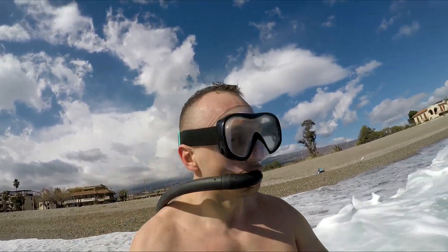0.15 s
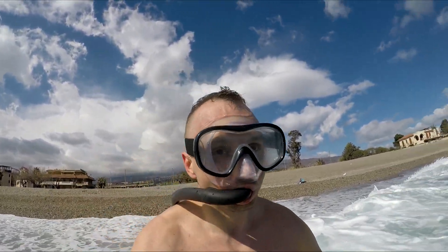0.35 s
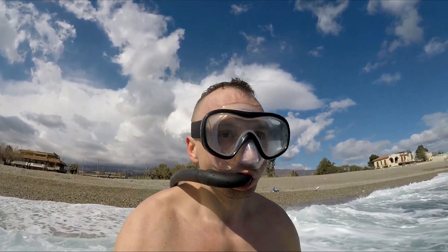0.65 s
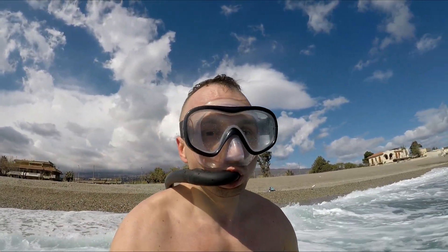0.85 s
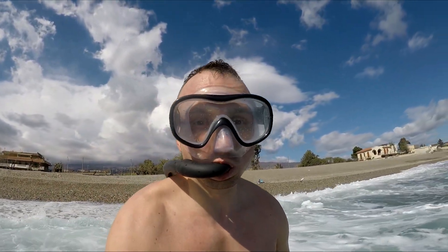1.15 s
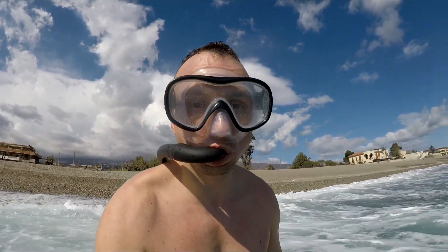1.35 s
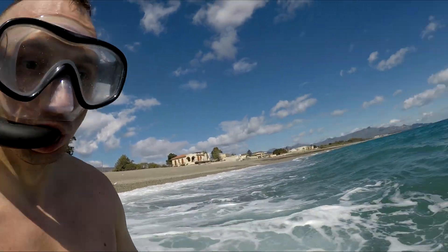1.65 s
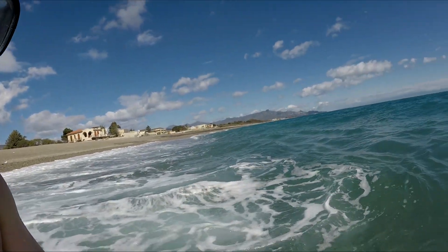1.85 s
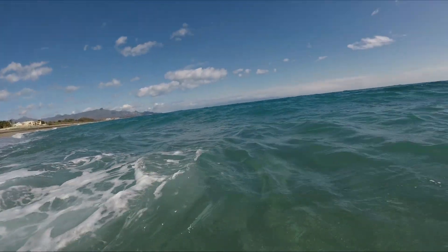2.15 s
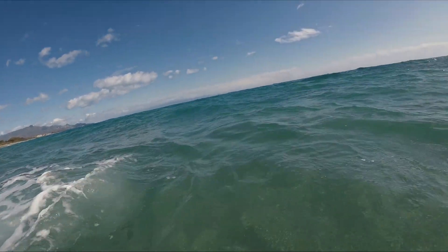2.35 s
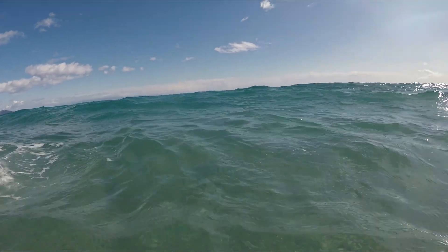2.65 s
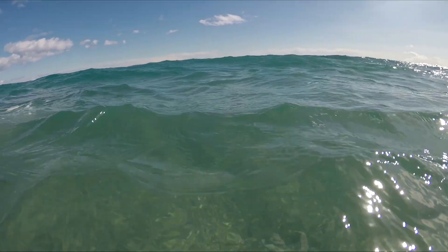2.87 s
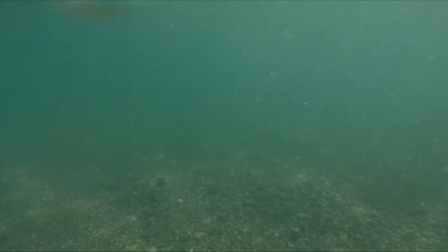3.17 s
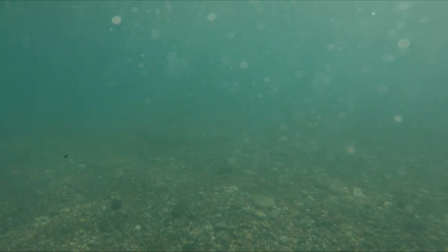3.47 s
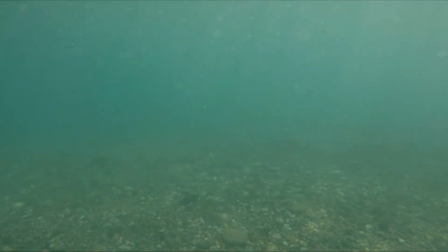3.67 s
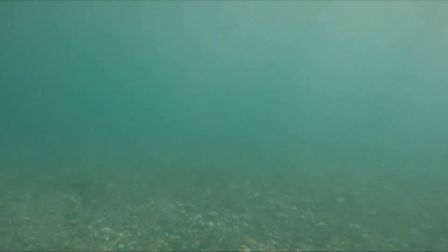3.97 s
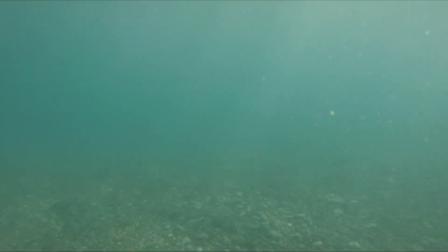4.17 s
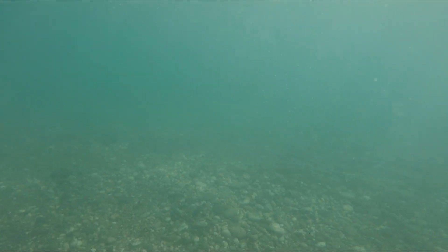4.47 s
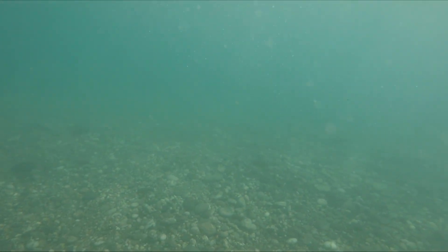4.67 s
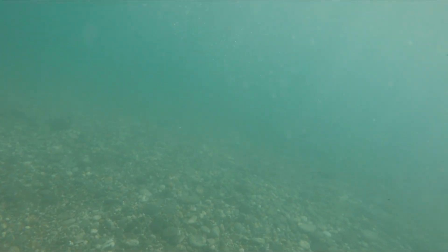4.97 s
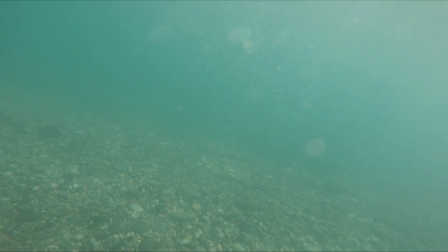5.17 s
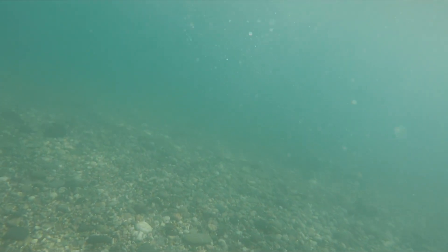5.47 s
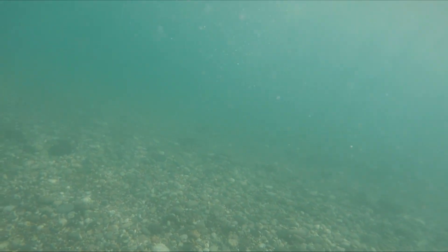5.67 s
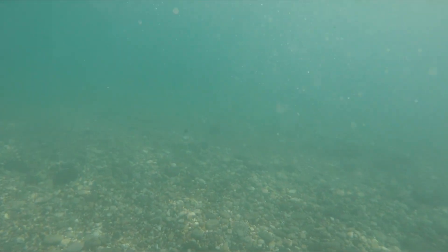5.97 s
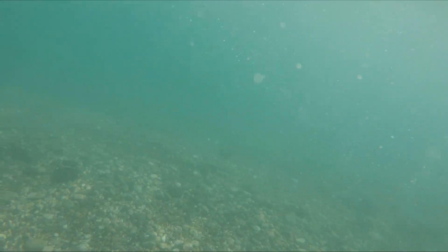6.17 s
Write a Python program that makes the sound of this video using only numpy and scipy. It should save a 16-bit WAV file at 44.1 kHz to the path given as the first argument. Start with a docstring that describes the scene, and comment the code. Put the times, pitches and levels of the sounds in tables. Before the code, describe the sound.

At a beach, close on a handheld camera in a case, wind buffets over broad surf wash and thin foam hiss. Low slaps and hollow plops knock the case with small splashes and droplet ticks, growing denser. A hard plunge abruptly shuts off the treble; muffled gulps, rumble and swarms of bubbles follow, then quick evenly spaced bubble blips and a faint growing fizz.

```python
"""Camera pushed under at a beach

Wind lumps, surf wash and foam hiss are shaped noise; slaps, plops and drops on the case are damped tones.
At about 3.3 s the case goes under: the treble shuts off and swarms of random bubble pings gurgle.
A chain of evenly spaced two-tone bubbles leaves one air pocket; gliding tones ring in others.
Gain control ducks after loud blows."""
import sys
import numpy as np
from scipy import signal
from scipy.fft import rfft, irfft
from scipy.io import wavfile
from scipy.ndimage import uniform_filter1d

SR = 44100
rng = np.random.default_rng(int(sys.argv[2]) if len(sys.argv) > 2 else 0)


def master_out(mix):
    """Clip the mix to full scale and print it as 16-bit PCM to the path in sys.argv[1]."""
    frames = np.transpose(np.atleast_2d(mix))
    ceiling = np.clip(frames, -1, 1)
    pcm = np.round(ceiling * 32767).astype(np.int16)
    wavfile.write(sys.argv[1], SR, pcm)


N = 278712
T_S = np.arange(N) / SR

# slow levels above the surface, before gusts and surges: t/s, wind/dB, wash/dB, foam/dB
AIR_LEVELS = [(0, -22.5, -30, -38), (0.7, -28, -28.5, -39), (1.2, -41.5, -25.5, -39.5),
              (1.5, -22.5, -27.5, -41.5), (2.1, -31, -25, -37), (2.42, -30, -33, -43.5),
              (2.8, -20, -29.5, -46.5), (3.05, -34, -31, -44), (3.285, -14, -16, -39.5)]
# slow levels below: t/s, rumble/dB, large bubbles/dB, their pitch f/Hz, middle/dB, small/dB (before bursts)
WATER_LEVELS = [(3.291, -45.5, -43, 184, -32.5, -43), (3.409, -40.5, -35, 172.5, -34.5, -54),
                (3.501, -31, -31.5, 140, -34, -41.5), (3.8, -33.5, -28, 262, -35.5, -42),
                (3.95, -29.5, -23.5, 180, -34.5, -49), (4.299, -37, -21.5, 249, -27, -44.5),
                (4.499, -29, -21, 185, -28, -48), (4.699, -34.5, -30, 128.8, -30.5, -55),
                (5.109, -31, -41, 146, -29, -45.5), (5.201, -31.5, -22, 199, -29, -46),
                (5.45, -23.5, -22.5, 237, -25.5, -44), (5.802, -25.5, -33, 233, -24.5, -43),
                (6.06, -32.5, -46.5, 136, -23, -37), (6.28, -24, -23.5, 192, -17, -33)]
# single bubbles closing near the ports: t/s, peak level/dB, f/Hz
PLOP_EVENTS = [(1.799, -9, 532), (1.89, -11, 560), (1.923, -16.5, 1140), (2.158, -16.5, 500),
               (2.203, -17, 596), (2.469, -7.5, 650), (2.509, -6.5, 590), (2.533, -20, 700),
               (2.56, -12, 630), (2.574, -6.5, 560), (2.696, -9, 940), (3.163, -7.5, 1780),
               (3.188, -9, 774), (3.204, 1, 690), (3.268, -6, 504), (4.072, -17, 560), (4.135, -16.5, 706),
               (4.17, -18.5, 643), (4.197, -23.5, 995), (4.293, -11, 439), (4.486, -27, 1360),
               (5.476, -11, 475), (5.495, -8.5, 460), (5.731, -13, 897), (5.841, -10.5, 529)]
AIR_END_S, WATER_START_S = AIR_LEVELS[-1][0], WATER_LEVELS[0][0]


def amp(db):
    """Amplitude factor of a level in dB."""
    return 10 ** (np.asarray(db) / 20)


def evened(x):
    """Scale to an RMS of 1."""
    return x / np.sqrt(np.mean(x ** 2) + 1e-20)


def read(points, hz):
    """Interpolate a frequency table on a log axis."""
    f, value = np.transpose(points)
    return np.interp(np.log(hz + 1), np.log(f + 1), value)


def at(points, s=T_S):
    """Interpolate a time table, end values held."""
    return np.interp(s, *np.transpose(points))


def levels(rows):
    """One gain curve per dB column: silent before the table, last row held."""
    s, *columns = np.transpose(rows)
    return [amp(np.interp(T_S, s, column, -200)) for column in columns]


def bumps(rows, half_s):
    """Sum of bell-shaped lifts in dB, one for each row."""
    return sum(db * np.exp(-((T_S - s) / half_s) ** 2) for s, db in rows)


def add(mix, s, sound):
    """Add a two-channel sound at s, cut at the end of the mix."""
    part = mix[:, round(s * SR):][:, :sound.shape[1]]
    part += sound[:, :part.shape[1]]


def lowpass(x, order, hz):
    """Butterworth lowpass."""
    return signal.sosfilt(signal.butter(order, hz, fs=SR, output="sos"), x)


def noise(colour, size, patchy_db, flicker_db):
    """Two channels of random short-time spectra, with patches and a flicker shared by all bins."""
    # left-right coherence: f/Hz, coherence/1
    same = [(60, 0.97), (170, 0.55), (470, 0.76), (1300, 0.65), (10000, 0.39)]
    # phase by which the left port leads: f/Hz, lead/rad
    lead = [(550, 0.92), (1030, 2.3), (2300, 1.82), (3600, 0.3), (7200, -2)]
    # right port over left: f/Hz, level/dB
    right_over_left = [(600, 0), (6000, 3)]
    hop, hz = size // 4, np.fft.rfftfreq(size, 1 / SR)
    a, b, c, d, patches = rng.standard_normal((N // hop + 5, len(hz), 5)).T
    flicker = evened(uniform_filter1d(patches[0], size=4))
    patches = uniform_filter1d(patches, size=8, axis=0)
    patches = evened(uniform_filter1d(patches, size=10, axis=1))

    like = np.clip(read(same, hz), -1, 1)[:, None]
    lag = np.exp(-1j * read(lead, hz))[:, None]
    left = a + 1j * b
    right = like * lag * left + np.sqrt(1 - like ** 2) * (c + 1j * d)
    z = np.array([left, right])
    z *= amp(np.outer([-.5, .5], read(right_over_left, hz)))[:, :, None]
    z *= amp(read(colour, hz)[:, None] + patchy_db * patches + flicker_db * flicker)
    return evened(signal.istft(z, nperseg=size, noverlap=size - hop)[1][:, :N])


def ping(hz, t60, rise_s, glide):
    """Damped tone, envelope peak 1; its frequency climbs by the share 2 * glide over t60 seconds."""
    t = np.arange(round(t60 * SR) + 20) / SR
    shape = (1 - np.exp(-t / rise_s)) * amp(-60 * t / t60)
    return shape / shape.max() * np.sin(2 * np.pi * hz * t * (1 + glide * t / t60))


def struck(rows, rise_cycles, glide, late_ms, lag_ms):
    """Damped tones shortly after contact; the right port lags until water bridges the ports."""
    out = np.zeros((2, N))
    for s, db, hz, t60 in rows:
        tone = amp(db) * ping(hz, t60, rise_cycles / hz, glide)
        right_lag_ms = lag_ms * np.interp(s, [3.1, 3.3], [1, 0])
        add(out, s + late_ms / 1000, tone * [[1], [0]])
        add(out, s + (late_ms + right_lag_ms) / 1000, tone * [[0], [1]])
    return out


def slaps():
    """The case rings low under each slap; gulps below swell softly and stop short; plops ring higher."""
    # water slapping the case, large gulps below: t/s, peak level/dB, f/Hz
    slap_events = [(1.439, -16, 142), (1.506, -13, 78.5), (1.662, -3, 127), (1.773, 1.5, 140),
                   (2.024, -6, 87.4), (2.156, -2, 127), (2.205, -6, 157), (2.253, -8.5, 134),
                   (2.335, -3, 278), (2.459, -11.5, 128), (2.696, -3.5, 141.4), (3.126, -0.5, 177),
                   (3.179, -1, 60.6), (3.277, 5.5, 275), (3.612, -6.5, 176), (3.686, -3.5, 192),
                   (3.74, -8.5, 322), (3.765, -8, 272), (3.789, -21, 270), (3.806, -20, 330),
                   (3.832, -16, 250), (4.344, -9, 172), (5.16, -11, 103)]
    # a hard slap is smothered by water; softer ones ring longer
    t60_cycles_at_0db, cycles_per_db = 6.7, 0.58
    plops = [(s, db, hz, 24 / hz) for s, db, hz in PLOP_EVENTS]
    knocks = [(s, db, hz, (t60_cycles_at_0db - cycles_per_db * db) / hz)
              for s, db, hz in slap_events if s < WATER_START_S]
    gulps = [(s, db, hz, 3.7 / hz) for s, db, hz in slap_events if s > WATER_START_S]
    out = struck(knocks, 0.033, 0.19, late_ms=4.2, lag_ms=0.98)
    out += struck(plops, 0.16, 0.029, late_ms=1.4, lag_ms=0.77)
    out += struck(gulps, 0.69, 0.068, late_ms=6.0, lag_ms=0)
    return lowpass(out, 2, 1800)


def swarm(centre_hz, usual_hz, octaves, per_s, cycles, murmur, clump_db):
    """Bubbles of one size class pop in clumps around a centre pitch, a few loud; far ones blur to a murmur."""
    pops = amp(4.9 * np.minimum(rng.exponential(1, N), 4)) * (rng.random(N) < per_s / SR)
    kind, out = rng.integers(0, 14, N), np.zeros(N)
    clumps = uniform_filter1d(rng.standard_normal(N), size=1100)
    clumps = evened(uniform_filter1d(clumps, size=700))
    # 4.5 to 5.5 s: murmur grows sixfold; clumping vanishes at 5 s, then returns inverted
    calm = np.clip(T_S - 4.5, 0, 1)
    far = (1 + 5.0 * calm) * murmur * np.sqrt(per_s / 3000) * rng.standard_normal(N)
    drive = (pops + far) * amp(clump_db * (0.5 - 1.0 * calm) * clumps)
    for k, hz in enumerate(usual_hz * np.geomspace(.5, 2, num=14)):
        share = .12 + np.exp(-.5 * (np.log2(hz / centre_hz) / octaves) ** 2)
        bubble = ping(hz, 3.5 * cycles / hz, 0.5 / hz, glide=0.07)
        out += signal.oaconvolve(drive * share * (kind == k), bubble)[:N]
    return out / np.sqrt(uniform_filter1d(out ** 2, size=7000) + 1e-12)  # level evened over 0.16 s


def chain():
    """Bubbles pinch off the pocket one after another, each with its tone and a higher one."""
    # runs of evenly spaced bubbles: first t/s, last t/s, gap/s
    runs = [(3.502, 3.61, .0195), (4.733, 4.81, .022), (4.838, 4.92, .026), (4.944, 5.08, .031),
            (5.125, 5.2, .023), (5.2225, 5.44, .0231), (5.457, 5.58, .028), (5.65, 5.9, .0275),
            (5.939, 6.05, .0265), (6.124, 6.31, .0255)]
    # lower tone before scatter: t/s, peak level/dB
    loudness = [(4.75, -23), (4.95, -16), (5.06, -27), (5.2, -20.5), (5.33, -14.5), (5.41, -19.5),
                (5.6, -25.5), (6.2, -18)]
    # lower tone: t/s, f/Hz
    low_pitch = [(3.6, 503), (4.75, 800), (5.0, 794), (5.35, 852), (5.85, 850), (5.98, 946), (6.3, 930)]
    # higher tone: t/s, f/Hz
    high_pitch = [(5.22, 1210), (5.5, 1503), (5.7, 1360)]
    # higher tone relative to the lower: t/s, level/dB
    high_level = [(5.0, -19), (5.35, -9)]
    jitter_s, scatter_db = 0.0008, 1.8
    out = np.zeros((2, N))  # rows: lower, higher tones
    for first, last, gap in runs:
        for s, (low, high, late, loud) in zip(np.arange(first, last, gap), rng.standard_normal((20, 4))):
            gain = amp(at(loudness, s) + scatter_db * loud)
            start = s + jitter_s * (1 + 3 * (s > runs[-3][0])) * late  # the last runs stumble
            low_hz = at(low_pitch, s) * (1 + 0.033 * low)
            high_hz = at(high_pitch, s) * (1 + 0.051 * high)
            add(out, start, gain * ping(low_hz, 0.027, 0.0015, 0.068) * [[1], [0]])
            add(out, start, gain * ping(high_hz, 0.024, .0025, 0.0096) * [[0], [1]])
    return out[0] + amp(at(high_level)) * out[1]


def water():
    """Rumble, swarms, chain and fizz; the ports differ until their trapped air is gone, then hear alike."""
    # large, middle, small: usual f/Hz, spread/octaves, rate/(1/s), ring/cycles (t60 is 3.5 times this),
    # murmur share/1, clumping/dB (at most half acts)
    size_classes = [(169.4, 0.73, 150, 8.8, 1, 4.5), (512.5, 0.59, 400, 9.6, 0.2, 1),
                    (1412, 0.62, 600, 10, 0.11, 2)]
    # pitch around which the small bubbles pop: t/s, f/Hz
    small_pitch = [(3.501, 966), (5.297, 1380)]
    # bursts of small bubbles over their slow level: peak t/s, lift/dB
    bursts = [(3.44, 9.5), (3.97, 6), (4.13, 7), (4.24, 3), (4.35, 9.5), (4.505, 9.5)]
    # fizz colour: f/Hz, relative level/dB per Hz
    fizz_colour = [(1940, -40), (3000, -7), (7300, -7), (8990, 0), (10500, -6), (13600, -30), (22000, -120)]
    # fizz: t/s, level/dB
    fizz_swell = [(4.7, -83.5), (5.2, -68.5), (6.1, -58), (6.3, -54.5)]
    # side over mid, before settling: f/Hz, level/dB
    wide = [(60, -9.5), (330, 13.5), (1820, 23.5)]
    # gain on the side part: t/s, level/dB
    settling = [(3.799, -20.5), (4.352, -28.5), (4.8, -79)]
    rumble_colour = [(20, 17.5), (45, 7.5), (80, 20.5), (130, -54.5)]  # f/Hz, relative level/dB per Hz

    rows = np.array(WATER_LEVELS)
    rumble, *gains = levels(rows[:, [0, 1, 2, 4, 5]])
    gains[2] = gains[2] * amp(bumps(bursts, half_s=0.04))
    centres_hz = [at(rows[:, [0, 3]]), size_classes[1][0], at(small_pitch)]
    mid = chain()
    for gain, hz, row in zip(gains, centres_hz, size_classes):
        mid += gain * swarm(hz, *row)
    mid = lowpass(mid, 4, 2400)  # flooded ports dull the bubbles
    mid += rumble * noise(rumble_colour, size=2048, patchy_db=6.0, flicker_db=-4.0)[0]
    mid += levels(fizz_swell)[0] * noise(fizz_colour, size=512, patchy_db=.5, flicker_db=.5)[0]

    # other bubbles at each port: the mix from 0.16 s ahead, opposite in the two channels
    other = np.roll(mid, -7000) * (mid != 0)
    side = irfft(rfft(other) * amp(read(wide, np.fft.rfftfreq(N, 1 / SR))), N)
    side *= amp(at(settling))
    return np.array([mid + side, mid - side])


def plunge():
    """A swarm churned up as the case breaks the surface, a little later at the right port."""
    # churned bubbles: t/s, level/dB
    churn_level = [(2.9, -30), (2.97, -25), (3.08, -22.5), (3.15, -33.5), (3.23, -26), (3.28, -35),
                   (3.34, -200)]
    churn = levels(churn_level)[0] * swarm(650, 650, 0.28, 355, 36.0, 0.3, 11)
    return np.array([churn, np.roll(churn, 30)])


def pockets():
    """Air pockets kept ringing by the churn: narrow gliding tones, wavering like a blown bottle."""
    # ringing pockets: start t/s, end t/s, level/dB before the waver, first f/Hz, last f/Hz
    pocket_events = [(2.023, 2.088, -16.5, 98, 158), (2.9, 3.123, -17.5, 116.5, 124.7),
                     (2.93, 2.986, -31.5, 777, 697), (2.995, 3.073, -24.5, 564, 512),
                     (2.995, 3.066, -24, 806, 750), (3.075, 3.143, -29.5, 1038, 1080),
                     (3.205, 3.241, -20.5, 907, 1070), (3.21, 3.267, -19.5, 741, 777),
                     (3.895, 3.947, -18, 226, 193), (3.97, 4.059, -20, 180.4, 206.6),
                     (6.03, 6.309, -23, 850, 935), (5.885, 5.974, -20.5, 494, 476),
                     (5.94, 6.098, -23, 132, 129), (5.975, 6.149, -19, 493.6, 531.5),
                     (6.12, 6.296, -15, 155.8, 152.4), (6.195, 6.293, -16, 336, 349)]
    q, edge_share = 5.0, 0.4  # pitch over bandwidth; share of the length spent fading in and out
    out = np.zeros((2, N))
    for start, end, db, first_hz, last_hz in pocket_events:
        count = round((end - start) * SR)
        turn = np.exp(2j * np.pi * np.cumsum(np.linspace(first_hz, last_hz, num=count)) / SR)
        r = np.exp(-np.pi * first_hz / q / SR)
        a, b = rng.standard_normal((2, 14000))
        waver = signal.lfilter([1], [1, -r], a + 1j * b)
        waver = signal.lfilter([1], [1, -r], waver)
        waver = 0.75 + waver[-count:] / np.sqrt(np.mean(abs(waver) ** 2))
        quarter = 1j ** (start < AIR_END_S)  # in air the right port lags a quarter cycle
        tone = (turn * waver * [[1], [1 / quarter]]).real
        add(out, start, amp(db) * signal.windows.tukey(count, edge_share) * tone)
    return out


def splashes():
    """Each plop above the surface throws a ragged noise splash that dies away."""
    # splash colour: f/Hz, relative level/dB per Hz
    splash_colour = [(150, -10.5), (500, -0.5), (1200, 1.5), (2300, -15.5), (4000, -47.5)]
    below_plop_db, t60_s = -12, 0.12
    level = np.zeros(N)
    for s, db, _ in PLOP_EVENTS:
        level += (T_S > s) * amp(db + below_plop_db - 60 * abs(T_S - s) / t60_s)
    level = (T_S < AIR_END_S) * uniform_filter1d(level, size=120)
    return level * noise(splash_colour, size=256, patchy_db=4.0, flicker_db=3.5)


def drops():
    """Drops on the ports: a short ping louder on the right, a wide tick, a burst of spray at the pitch."""
    # drops and spray: t/s, ping peak level/dB, f/Hz
    drop_events = [(0.472, -25, 2070), (0.716, -25.5, 1870), (1.989, -25.5, 2160), (2.1613, -21, 3080),
                   (2.2776, -24, 3940), (2.321, -22, 2020), (2.5652, -23, 2080), (2.652, -18, 1990),
                   (2.7764, -29.5, 2820), (2.814, -25, 1430), (2.9128, -24.5, 7050), (2.984, -17.5, 6070),
                   (3.0308, -23.5, 3460), (3.076, -21.5, 7400), (3.0883, -11, 2990), (3.11, -14.5, 2040),
                   (3.13, -4, 5900), (3.175, -14, 1610), (3.187, -24.5, 6500), (3.2192, -13, 2640),
                   (3.244, -18, 4060), (3.2758, -16, 2260), (3.325, -24.5, 990), (3.3565, -24, 1080),
                   (3.393, -24, 920), (3.4376, -37, 1500), (3.5314, -33.5, 1660), (3.713, -37, 2500),
                   (3.8241, -37, 2060), (4.24, -45, 2660), (4.357, -46.5, 2600)]
    out, n = np.zeros((2, N)), np.arange(1200)
    for s, db, hz in drop_events:
        wet = s > WATER_START_S  # below: weaker tick, slower ping
        tick, spray = rng.standard_normal((2, 2, 1200))
        tick_db = db + 1.5 + 5 * np.log2(hz / 5000) - 32 * wet - 0.21 * n
        add(out, s, amp(tick_db) * tick)
        add(out, s, amp(db) * ping(hz, 0.0079 + 14 / hz, 0.0001 + 0.00097 * wet, 0.059) * [[.6], [1]])
        resonance = ping(0.99 * hz, 3 / hz, .0001, 0)[None]
        spray = evened(signal.oaconvolve(spray, resonance, axes=1)[:, :1200])
        add(out, s, amp(db - 5.0 - 0.044 * n) * spray)
    return lowpass(out, 6, 9000)


def air():
    """Wind lumps, the broad wash of the surf and the hiss of its foam, until the ports go under."""
    # wind colour: f/Hz, relative level/dB per Hz
    wind_colour = [(12, -16.5), (20, -5.5), (242, -20.5), (390, -33), (660, -120)]
    # wash colour: f/Hz, relative level/dB per Hz
    wash_colour = [(88, 0), (489, -9), (1000, -15), (1880, -17.5), (2600, -26.5), (3380, -37.5),
                   (5720, -120)]
    # foam colour: f/Hz, relative level/dB per Hz
    foam_colour = [(1350, 2), (2300, -31), (2910, 0.5), (3970, 4), (4960, 0.5), (6120, 4.5), (6950, 5),
                   (8900, -1.5), (10500, -11.5), (13600, -21.5), (22000, -120)]
    # gusts on the ports: peak t/s
    gusts = [1.82, 2.04, 2.22, 2.55]
    # small waves breaking close by lift wash and foam: peak t/s, lift/dB
    surges = [(0.78, 4.5), (1.7, 4), (2.33, 5.5), (3.11, 6.5)]
    wind, wash, foam = levels(AIR_LEVELS)
    gust = amp(bumps([(s, 12.5) for s in gusts], half_s=0.073))  # 12.5 dB lift
    surge = amp(bumps(surges, half_s=0.045))
    above = uniform_filter1d(1. * (np.arange(N) < AIR_END_S * SR), size=300)
    out = wind * gust * noise(wind_colour, size=2048, patchy_db=2.5, flicker_db=1.0)
    out += wash * surge * noise(wash_colour, size=512, patchy_db=2.0, flicker_db=1.5)
    out += foam * surge * noise(foam_colour, size=256, patchy_db=2.0, flicker_db=1.2)
    return above * out


def scene():
    """Sum of all sources at the two ports."""
    return slaps() + water() + plunge() + pockets() + splashes() + drops() + air()


def record(dry):
    """Gain control ducks after loud blows, the treble most; soft overload, then the band limit."""
    bass_cut_hz, treble_hz, edge_hz = 27, 2500, 15500
    duck_from_db, recover_db_per_s = -16, 140
    low_share, treble_share = 0.43, 1  # dB of ducking per dB over
    dry = signal.sosfilt(signal.butter(2, bass_cut_hz, "high", fs=SR, output="sos"), dry)
    power_db = 10 * np.log10(abs(uniform_filter1d((dry ** 2).mean(0), size=400)) + 1e-12)
    # peak hold that falls at a steady rate
    fall = T_S * recover_db_per_s
    held_db = np.maximum.accumulate(power_db + fall) - fall
    over_db = np.maximum(held_db - duck_from_db, 0)
    late_db = signal.lfilter([.003], [1, .003 - 1], over_db)
    low = signal.sosfiltfilt(signal.butter(2, treble_hz, fs=SR, output="sos"), dry)
    ducked = low / amp(low_share * late_db) + (dry - low) / amp(treble_share * late_db)
    soft = 1.598 * np.tanh(ducked / 1.27)
    band = signal.firwin(511, edge_hz, window=("kaiser", 9), fs=SR)
    return signal.oaconvolve(soft, band[None], "same")


dry = scene()
out = record(dry)
master_out(out)
```